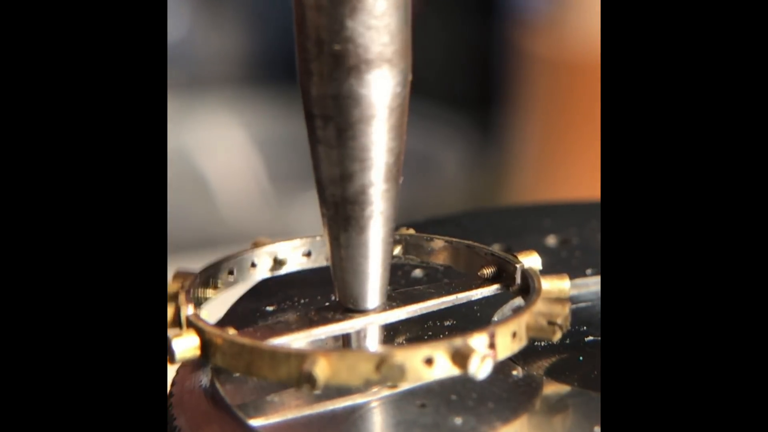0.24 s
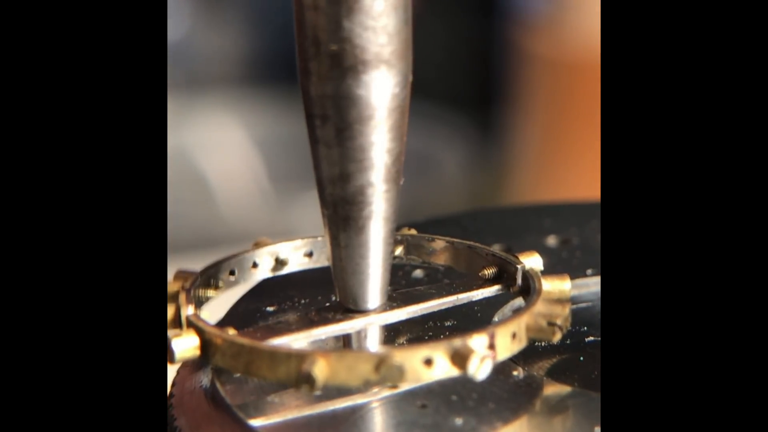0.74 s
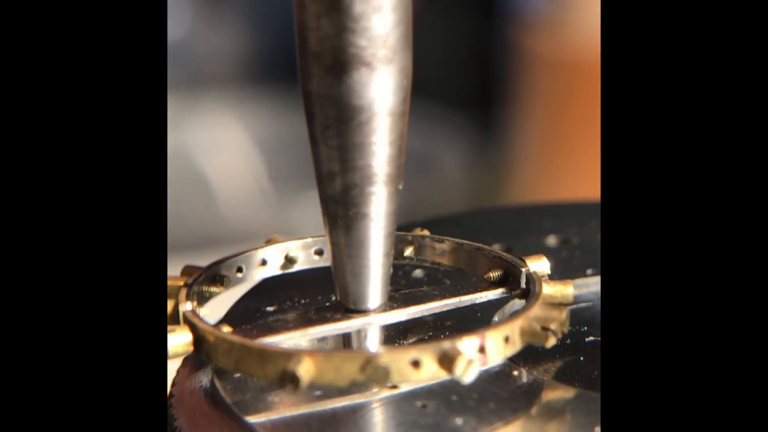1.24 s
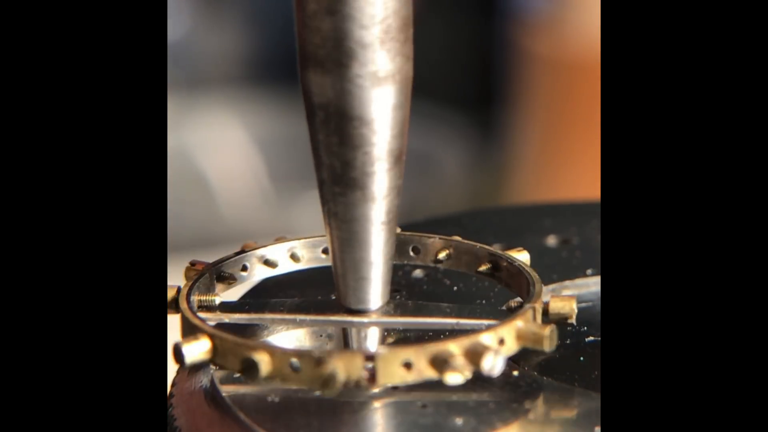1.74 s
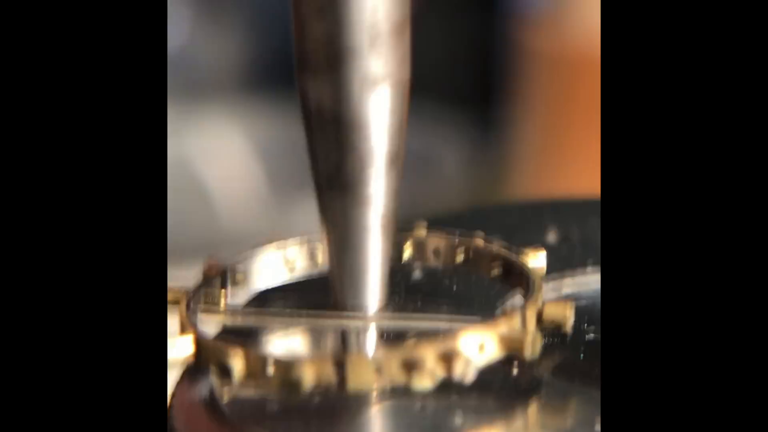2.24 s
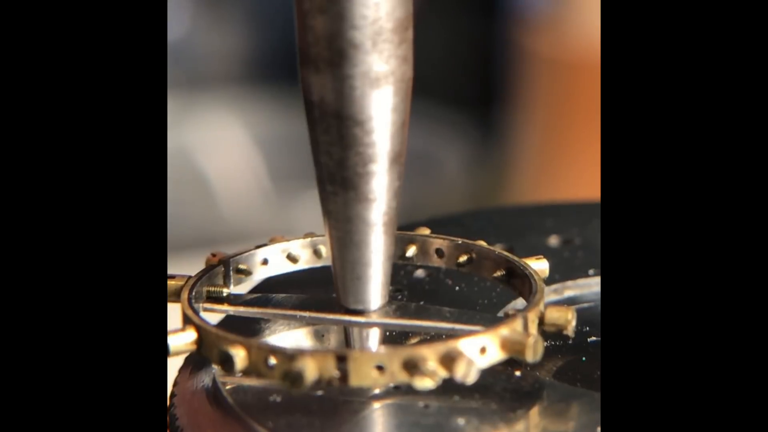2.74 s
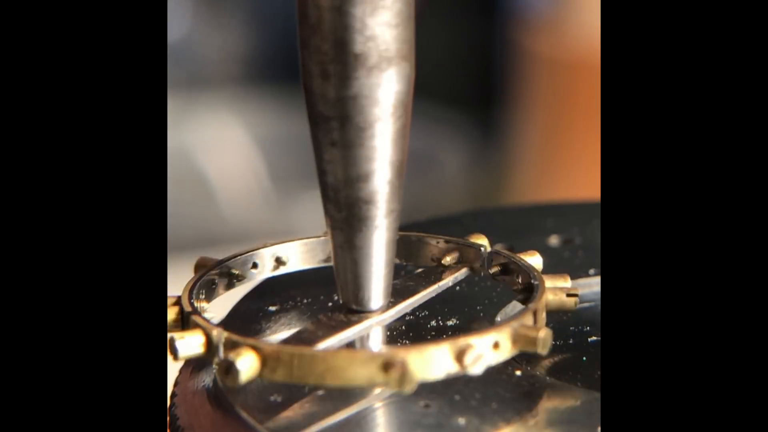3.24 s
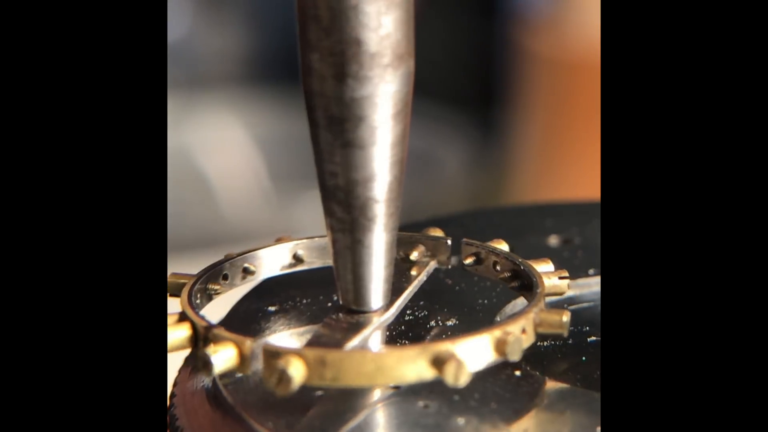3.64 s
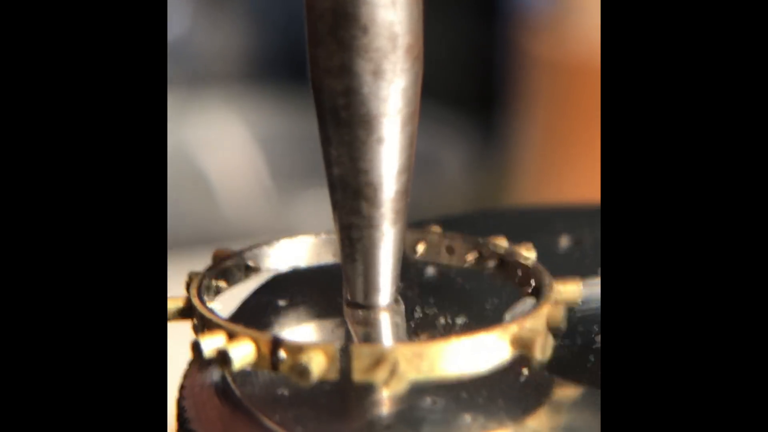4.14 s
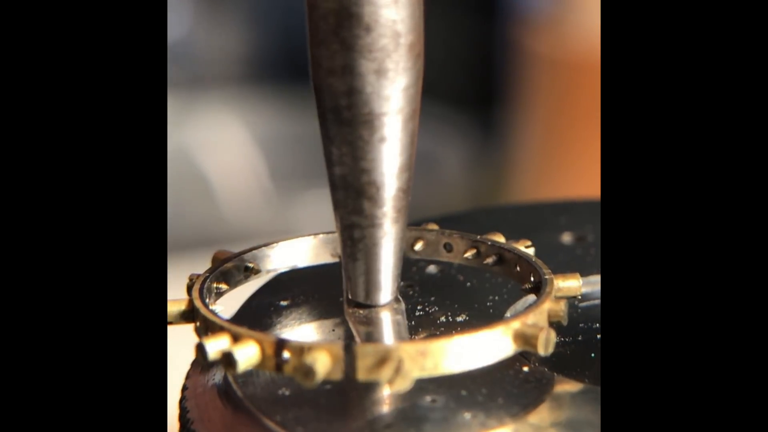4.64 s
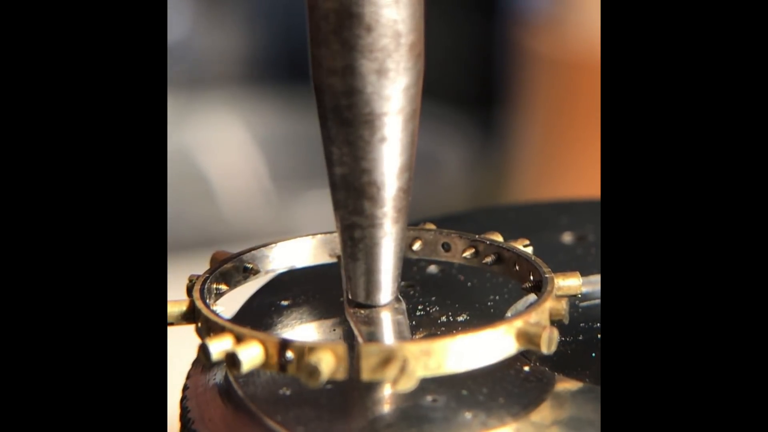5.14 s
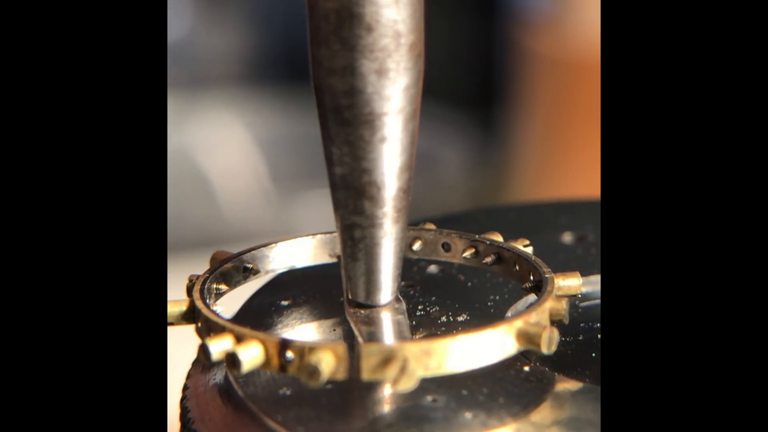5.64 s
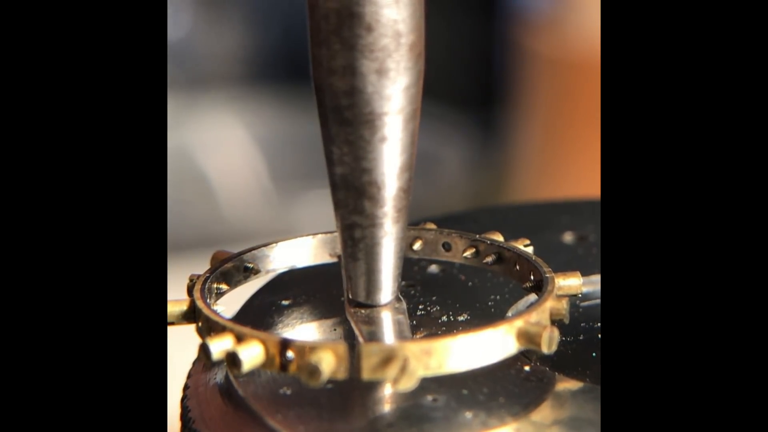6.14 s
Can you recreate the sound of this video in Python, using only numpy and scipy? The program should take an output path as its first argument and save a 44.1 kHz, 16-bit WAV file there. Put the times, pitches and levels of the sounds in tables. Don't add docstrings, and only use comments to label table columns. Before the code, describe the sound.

Sharp, bright metal taps with short rings and a light bench thump, spaced by quiet pauses, ending with a hammer laid down and rattling still.

```python
import sys
import numpy as np
from scipy import signal
from scipy.fft import rfft, irfft, next_fast_len
from scipy.io import wavfile
from scipy.ndimage import uniform_filter1d, map_coordinates

SR = 44100
rng = np.random.default_rng(int(sys.argv[2]) if len(sys.argv) > 2 else 0)


def int16_out(signal):
    q = np.round(np.clip(np.atleast_2d(signal).T, -1, 1) * 32767)
    wavfile.write(sys.argv[1], SR, q.astype(np.int16))


def natural_amplitude(level_db):
    exponent = np.asarray(level_db, float) / 20
    return 10 ** exponent


N = 281799

# start_s, peak_db, head_ring_db, overtone_db, lamp_db
TAPS = [
    (0.2560, -3, -34.5, -35.5, -49.5),
    (0.64, -2.5, -31.5, -26.5, -53),
    (0.9916, -1.5, -37, -36, -55.5),
    (2.3495, -3, -24, -20, -64.5),
    (2.7499, -1, -38, -31.5, -57),
    (4.2332, -4, -24.5, -16.5, -59.5),
    (4.6179, -1, -25, -16, -54.5),
]
CLOSING = [2, 4, 6]
# start_s, face_db, handle_db, neck_db, tray_db
LAID = [
    (5.28, -67, -63, -51.5, -72),
    (5.674, 1, -14, -10, -28),
    (5.691, -6.5, -11, -39.5, -24.5),
    (5.83, -24, -34, -44, -48),
    (5.906, -58, -32, -30, -32),
]
# start_s, handle_db, tray_db
ROCKS = [(5.756, -26.5, -34), (5.775, -44, -33), (5.871, -22.5, -25), (5.949, -33, -31),
         (5.975, -34.5, -29.5), (5.987, -36, -36.5), (6.002, -35, -32)]
# start_s, level_db, t60_s
SCRAPES = [
    (1.55, -59.5, 0.68),
    (3.55, -63, 0.59),
    (3.599, -63, 0.51),
    (5.556, -60.5, 0.68),
]
# start_s, end_s
NOISY = [(.256, 1.405), (2.35, 3.178), (4.233, 5.058), (5.674, 6.085)]

# pitch_hz, level_db
CRACK = [(300, -10), (1000, -0.5), (2000, -6.5), (4000, -7), (6500, -15.5), (9000, -2), (13000, -10),
         (16500, -14.5)]
# pitch_hz, width_hz, level_db
BLOCK = [(965, 110, -7), (1397, 140, -4.5), (2094, 140, -6), (3190, 420, -5), (4190, 380, -8),
         (5238, 100, 5.5), (6143, 390, -5.5), (7270, 90, -5.5), (10867, 69, -6.5), (12000, 52, -8)]
STRIKE_HZ = [610, 860, 1020, 1370, 2137, 2802, 3232, 4030, 5350, 6204, 9388, 10839, 11867, 13050]
# level_db, t60_s
STRIKE = [(-13.5, .028), (-14, 0.022), (-11, 0.035), (-17, 0.05), (-20, 0.023), (-16, 0.041), (-21, 0.027),
          (-21, 0.035), (-8.5, 0.041), (-17.5, .05), (-19, 0.032), (-8, 0.027), (-21.5, 0.071),
          (-20.5, .02)]
BENCH_HZ = [52, 72, 88, 119, 140, 181, 222, 247, 270, 296, 355, 400, 190]
# level_db, t60_s
BENCH = [(-15, 0.53), (-2.5, 0.3), (-1, 0.2), (-2.5, 0.35), (-4, 0.19), (-5, 0.35), (-10.5, 0.61),
         (1.5, 0.35), (-16.5, 0.32), (-17, 0.15), (-9, .45), (-20, 0.25), (9.5, 0.087)]
# pitch_hz, width_hz, level_db
TRAY = [(171.3, 87, -9), (228, 49, -3.5), (303, 67, -4.5), (409, 38, 1), (689, 97, -5)]
# pitch_hz, width_hz, level_db
FACE = [(2086, 130, 4), (2435, 280, -0.5), (2914, 400, -4.5), (3820, 350, 2.5), (4500, 200, 0.5),
        (5920, 250, 3), (11950, 78, -9.5)]
# pitch_hz, width_hz, level_db
HANDLE = [(1035, 210, -0.5), (1460, 184, -5.5), (2090, 170, -5.5)]
# pitch_hz, width_hz, level_db
NECK = [(4255, 250, -1), (5580, 59, -0.5), (6430, 200, -0.5)]
# pitch_hz, t60_s
ROOM = [(100, 1), (400, 0.57), (1000, 0.9), (2500, 0.8), (5500, 0.74), (9000, 0.65), (15000, 0.12)]
# pitch_hz, level_db
ROOM_COLOUR = [(60, -24.5), (300, -6.5), (500, -9), (1000, -8.5), (3000, -11.5), (6400, -19), (7000, -22),
               (15000, -22)]
# pitch_hz, level_db
SCRAPE = [(800, -12), (1300, -5.5), (2500, -11), (5500, -12), (7000, -22.5), (10000, -28.5), (12000, -52)]
# pitch_hz, level_db (per Hz)
AIR = [(13, -54), (24, -25.5), (43, -4), (150, -9), (330, -9.5), (560, -20), (1200, -23), (16000, -34.5)]
# pitch_hz, width_hz, level_db (over the hush)
HUMS = [(52.6, 15, 1), (118, 14, 2), (211, 25, 2), (667, 30, 11)]
# pitch_hz, level_db
HISS = [(300, -3), (2000, 0), (8000, 0), (15500, 0), (15800, -30)]
# pitch_hz, scatter_hz, level_db (at the blow), growth_db_per_s
WHISTLES = [(3058, 10, -27.5, 2200), (2490, 110, -35, 501.5)]

HEAD_HZ, OVERTONE_HZ, OVERTONE_T60_S = 8314, 15600, 0.14
BLOCK_SAMPLES = 1024


def along(points, hz):
    f, v = np.transpose(points)
    return np.interp(np.log(hz + 1), np.log(f + 1), v)


def unit(x):
    return x / np.sqrt(np.mean(x ** 2) + 1e-20)


def filtered(x, response):
    m = next_fast_len(len(x) + 8192)
    return irfft(rfft(x, m) * response(np.fft.rfftfreq(m, 1 / SR)), m)[:len(x)]


def noise(n, spectrum):
    return unit(filtered(rng.standard_normal(n), lambda hz: natural_amplitude(along(spectrum, hz))))


def resonant(hz, modes):
    total = 0
    for k, (centre, width, db) in enumerate(modes):
        peak = 1j * hz * width / (centre * centre - hz * hz + 1j * hz * width)
        total = total + (-1) ** k * natural_amplitude(db) * peak
    return total


def ring(t, hz, db, t60, attack=0.0039):
    return natural_amplitude(db - 60 * t / t60) * np.sin(2 * np.pi * hz * t) * (1 - np.exp(-t / attack))


def add(track, s, x):
    part = track[round(s * SR):][:len(x)]
    part += x[:len(part)]


def echo(t, colour):
    hz, frames, z = signal.stft(rng.standard_normal(len(t)), SR, nperseg=256)
    fade = natural_amplitude(-60 * frames / along(ROOM, hz)[:, None])
    tail = signal.istft(z * fade, SR, nperseg=256)[1][:len(t)]
    return unit(filtered(tail, colour)) * (1 - np.exp(-t / 0.0021))


def hush():
    drones = lambda hz: 1 + sum(np.abs(resonant(hz, [row])) for row in HUMS)
    return natural_amplitude(-63.5) * unit(filtered(noise(N, AIR), drones))


def bench_thump(t):
    late = t - .0074
    thump = np.zeros(len(t))
    for hz, (level, t60) in zip(BENCH_HZ, BENCH):
        thump += natural_amplitude(level - 60 * np.abs(late) / t60) * np.cos(2 * np.pi * hz * late)
    thump *= 1 - np.exp(-(t / 0.0023) ** 2)
    shake = noise(len(t), [(35, -21), (70, 1), (250, 1.5), (400, -5.0), (600, -32.0)])
    return thump + natural_amplitude(-1.0 - 60 * t / 0.49) * shake * (1 - np.exp(-(t / 0.005) ** 2))


def crack(t, usual, free):
    steel = lambda hz: natural_amplitude(along(CRACK, hz)) * (.5 + 2.1 * resonant(hz, BLOCK))
    rattle = lambda hz: natural_amplitude(along(CRACK, hz)) * (0.28 / (1 + 1j * hz / 7000) + 2.9 * resonant(hz, BLOCK))
    snap = natural_amplitude(4.5 - 60 * t / 0.0057)
    chatter = 0.28 * natural_amplitude(-60 * t / 0.0083) * free + snap + 0.73 * natural_amplitude(-60 * t / 0.016)
    fresh = .8 * usual + .6 * rng.standard_normal(len(t))
    x = natural_amplitude(1) * filtered(fresh * chatter, steel)
    return x + filtered(rng.standard_normal(len(t)) * natural_amplitude(-7 - 60 * t / 0.24), rattle)


def punch_and_block(t, free):
    tones, reseat = np.zeros(len(t)), np.zeros(len(t))
    again = np.maximum(t - .0049, 0)
    for hz, (level, t60) in zip(STRIKE_HZ, STRIKE):
        tones += ring(t, hz, level + rng.normal(0, 1), t60, 4.1 / hz)
        if hz < 1500:
            reseat += ring(again, hz, level, t60 / 2, 0.00029)
    return (free + 0.31) * tones + natural_amplitude(0.5) * reseat


def long_rings(t, free, head_db, over_db):
    split_hz = 40
    x = (1.4 * free + 1) * ring(t, 7457, -20.5, .12)
    x += ring(t, HEAD_HZ, head_db + 6, .15, 0.0033)
    x += ring(t, OVERTONE_HZ + split_hz / 3, over_db + 1.5, OVERTONE_T60_S)
    return x + ring(t, OVERTONE_HZ - split_hz * 2 / 3, over_db + 2.5, .09)


def taps():
    out, t = np.zeros(N), np.arange(SR) / SR
    far = lambda hz: natural_amplitude(along(ROOM_COLOUR, hz)) * (.4 + 1.5 * resonant(hz, BLOCK))
    bright = lambda hz: 1 / (1 + (8500 / (hz + 1)) ** 8)
    free = 1 / (1 + (t / 0.0088) ** 12)
    bench = bench_thump(t)
    usual = rng.standard_normal(SR)
    for k, (s, db, head_db, over_db, _) in enumerate(TAPS):
        x = crack(t, usual, free) + punch_and_block(t, free)
        dull_db = -7 * (k in CLOSING)
        x -= (1 - natural_amplitude(dull_db)) * free * filtered(x, bright)
        x += natural_amplitude(-27) * bench
        wall = filtered(free * x, lambda hz: 1 / (1 + 1j * hz / 6000) ** 2)
        add(x, .0168, natural_amplitude(-17) * wall)
        x += long_rings(t, free, head_db, over_db)
        add(out, s, natural_amplitude(db) * (x + natural_amplitude(-41.5) * echo(t, far)))
    return out


def sympathy(hz, t60, levels_db, attack, waver_db):
    envelope, t = np.zeros(N), np.arange(2 * SR) / SR
    for row, db in zip(TAPS, levels_db):
        add(envelope, row[0], natural_amplitude(db - 60 * t / t60) * (1 - np.exp(-(t / attack) ** 2)))
    waver = map_coordinates(rng.standard_normal(100), [np.linspace(0, 99, N)])
    return envelope * natural_amplitude(waver_db * waver) * np.sin(2 * np.pi * hz * np.arange(N) / SR)


def lamp_shade():
    return sympathy(646, 2.3, [row[4] for row in TAPS], attack=0.075, waver_db=1.25)


def brass_wheel():
    levels_db = [(row[2] + row[3]) / 2 - 22.5 for row in TAPS]
    return sympathy(9895, 0.36, levels_db, attack=.002, waver_db=1.5)


def wheel_scrapes():
    out, t = np.zeros(N), np.arange(SR // 2) / SR
    for s, db, t60 in SCRAPES:
        grain = unit(uniform_filter1d(rng.standard_normal(len(t)), size=200))
        fade = natural_amplitude(db - 60 * t / t60) * (1 - np.exp(-t / 0.017))
        add(out, s, fade * natural_amplitude(1.3 * grain) * noise(len(t), SCRAPE))
    return out


def contact(t, face_db, handle_db, neck_db, tray_db):
    dull = lambda f: 1 / (1 + 1j * f / 5000) ** 2

    def hammer(f):
        face = 0.049 * dull(f) + resonant(f, FACE) / (1 + 1j * f / 9000)
        handle = resonant(f, HANDLE) * dull(f)
        neck = resonant(f, NECK) * dull(f) * 2
        return natural_amplitude(face_db + 1.5) * face + natural_amplitude(handle_db + 13) * handle + natural_amplitude(neck_db + 16) * neck

    touch = lambda f: hammer(f) * (dull(f) * 1.08 if face_db < -8 else 1)
    push = 7 * (t == 0) + 0.87 * rng.standard_normal(len(t)) * natural_amplitude(-60 * t / 0.026)
    click = filtered(push, touch)
    thud = rng.standard_normal(len(t)) * (natural_amplitude(-60 * t / 0.017) + 0.3 * natural_amplitude(-60 * t / 0.24))
    knock = filtered(thud, lambda f: resonant(f, TRAY) / (1 + 1j * f / 900) ** 2)
    head_db = -21 + 2.3 * face_db
    head = ring(t, HEAD_HZ, head_db, 0.14, .0008) + ring(t, OVERTONE_HZ, head_db - 28, OVERTONE_T60_S)
    base = .3 * natural_amplitude(max(face_db, handle_db) + 7)
    room = echo(t, lambda f: (np.abs(hammer(f)) + base) ** 0.75 * dull(f))
    room_db = max(face_db, handle_db - 2, neck_db + 0.5) - 48.0
    return click + natural_amplitude(tray_db + 18.5) * knock + head + natural_amplitude(room_db) * room


def laid_down():
    out, t = np.zeros(N), np.arange(SR) / SR
    rocks = [(s, db - 47, db, db - 35, tray_db) for s, db, tray_db in ROCKS]
    for s, *levels_db in LAID + rocks:
        add(out, s, contact(t, *levels_db))
    return out


def scene():
    return (hush() + taps() + lamp_shade() + brass_wheel() + wheel_scrapes() + laid_down())[None]


def low_gain_hiss():
    t = np.arange(N) / SR
    held = sum(1. * (t > start) * (t < end) for start, end in NOISY)
    return natural_amplitude(-66.5) * uniform_filter1d(held, size=300) * noise(N, HISS)


def whistles(t):
    total, left = np.zeros(len(t)), t[::-1]
    for hz, scatter, level, grows in WHISTLES:
        pitch = hz + scatter * rng.normal()
        phase = rng.uniform(0, 2 * np.pi)
        total += natural_amplitude(level - grows * left) * np.sin(2 * np.pi * pitch * left + phase)
    return total / (1 + (left / .013) ** 8)


def ghosts(x):
    out, t = np.zeros(N), np.arange(BLOCK_SAMPLES) / SR
    half, block_s = BLOCK_SAMPLES // 2, BLOCK_SAMPLES / SR
    smear_modes = [(2700, 400, -4), (5300, 150, -2.5), (1080, 600, -2), (185, 60, 4.5)]
    landing = (LAID[1][0], LAID[1][1] - 20)
    for k, (s, db) in enumerate([row[:2] for row in TAPS] + [landing]):
        attack = filtered(x[round(s * SR):][:half], lambda hz: hz > 500) * natural_amplitude(db - 60 * t[:half] / 0.03)
        add(out, s - block_s + 0.0014, natural_amplitude(-28 + 7.3 * (k == len(TAPS))) * attack)
        add(out, s - block_s / 2 + 0.001, natural_amplitude(-33.5) * attack)
        tones = whistles(t)
        smear = unit(filtered(rng.standard_normal(len(t)), lambda hz: resonant(hz, smear_modes)))
        lead = tones + natural_amplitude(-32 - 2400 * t[::-1]) * smear
        add(out, s - block_s, natural_amplitude(db + 7 * (k in CLOSING)) * lead)
    return out


def band_limit(x):
    open_s = .02
    gate, t = np.zeros(N), np.arange(round(open_s * SR)) / SR
    for s in [row[0] for row in TAPS] + [LAID[1][0]]:
        add(gate, s - .002, 1 - t / open_s)
    low = filtered(x, lambda hz: 1 / (1 + (hz / 15800) ** 400))
    top = filtered(x - low, lambda hz: natural_amplitude(along([(15800, 3), (16500, -7.5), (17300, -40)], hz)))
    return low + gate * top


def roll_off(x):
    return signal.sosfilt(signal.butter(12, 17320, fs=SR, output="sos"), x)


def record(dry):
    x = dry[0] + low_gain_hiss()
    x = x / (1 + np.abs(x / 1.1) ** 4) ** (1 / 4)
    x = band_limit(x + ghosts(x))
    return roll_off(x[None])


dry = scene()
out = record(dry)
int16_out(out)
```